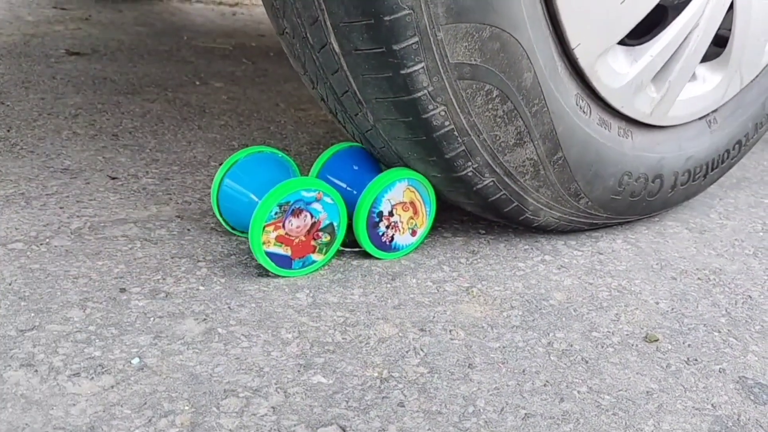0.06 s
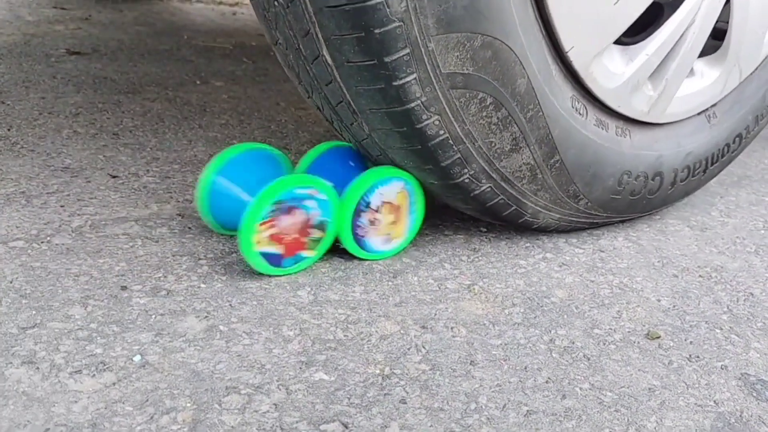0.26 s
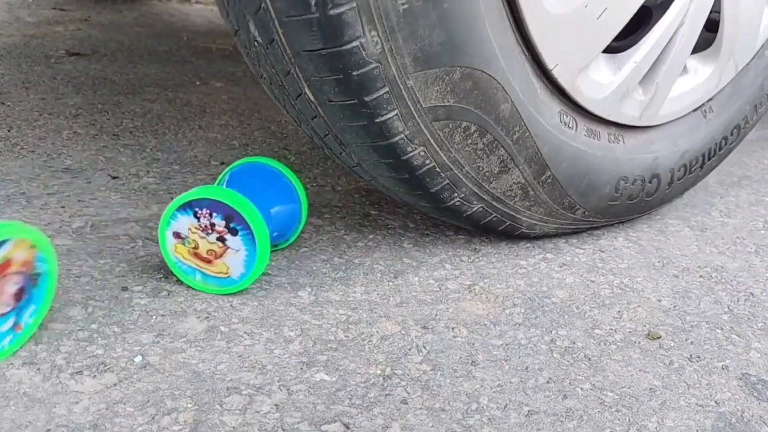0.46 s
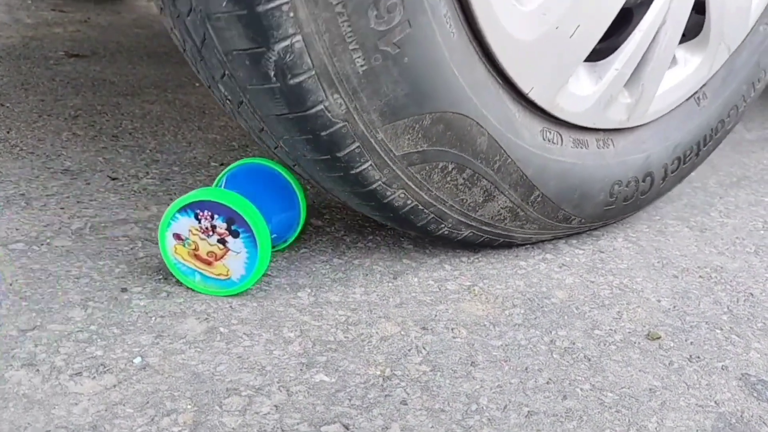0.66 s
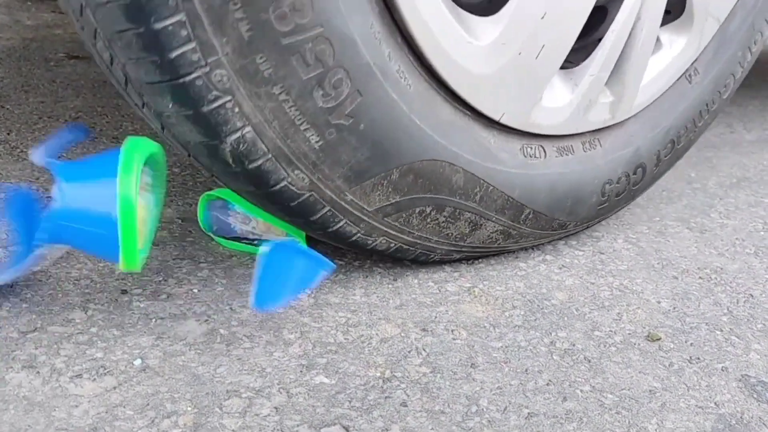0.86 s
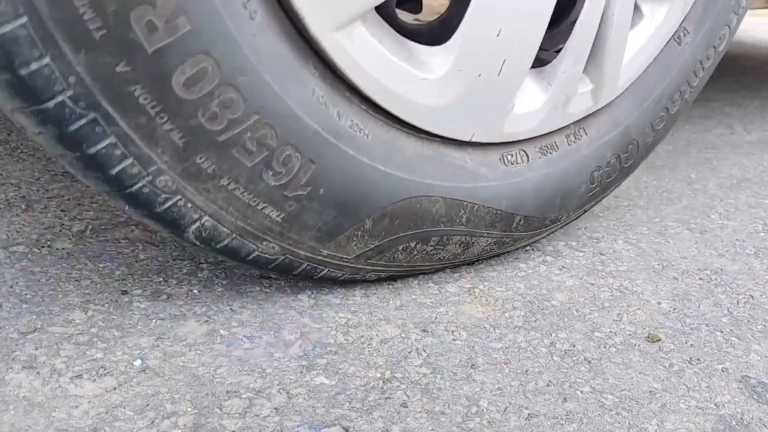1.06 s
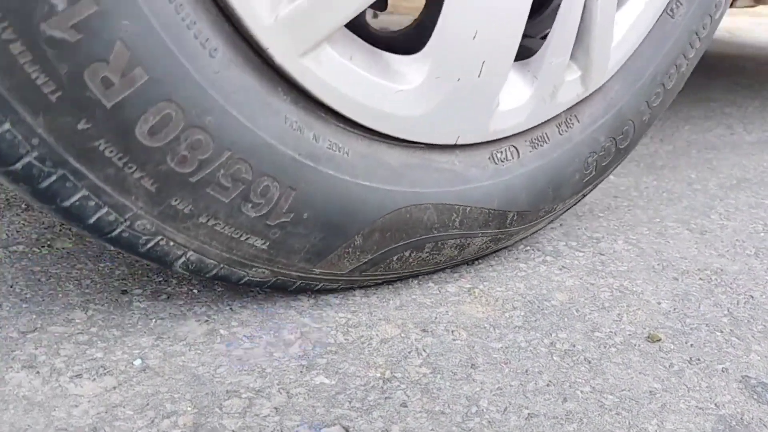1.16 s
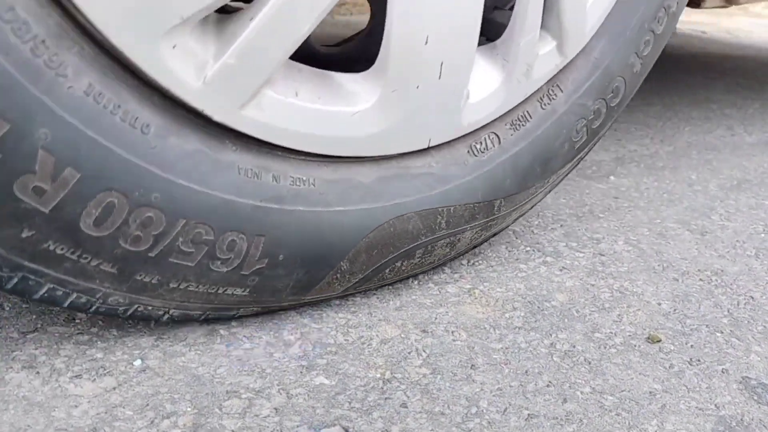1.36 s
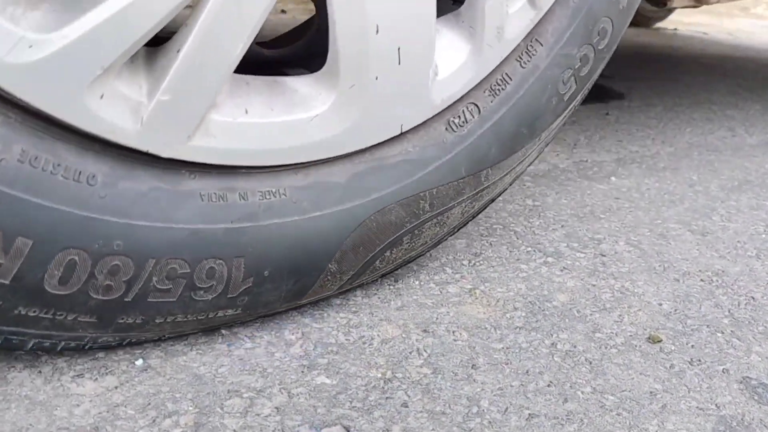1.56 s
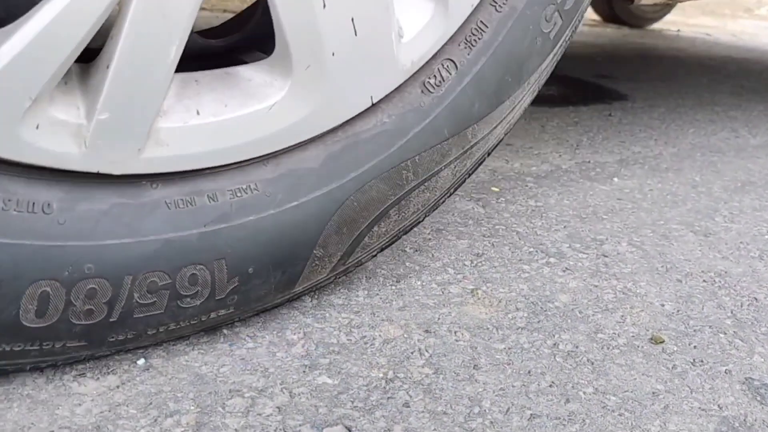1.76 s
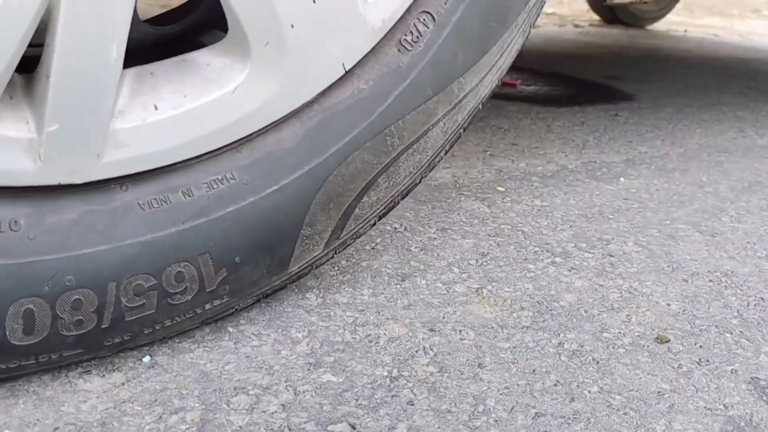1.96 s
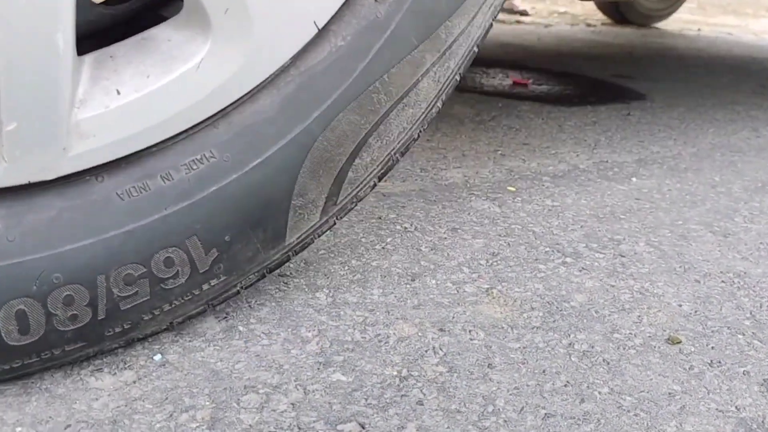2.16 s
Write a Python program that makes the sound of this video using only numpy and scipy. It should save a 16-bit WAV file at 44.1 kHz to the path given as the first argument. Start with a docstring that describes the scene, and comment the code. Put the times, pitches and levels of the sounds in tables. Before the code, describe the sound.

Plastic cracking, bursting and splintering as a car tyre crushes toys over a low engine rumble.

```python
"""On asphalt, close to the left microphone port, a car tyre rolls slowly over hollow plastic toy wheels.
The engine rumbles and a distant bird chirps as the tread starts to rub and crunch grit. The plastic pops,
cracks and bursts with a puff of air; a hollow shell hums, a loose disc clacks, the toy scrapes free.
Two more bursts come near 0.8 s, then splinters snap and dull thuds follow as the car draws level."""
import sys
import numpy as np
from scipy import signal
from scipy.fft import rfft, irfft, next_fast_len
from scipy.io import wavfile
from scipy.ndimage import uniform_filter1d

SR = 44100
rng = np.random.default_rng(int(sys.argv[2]) if len(sys.argv) > 2 else 0)


def wav_record(signal):
    """Record a signal, one row per channel, as 16-bit PCM in the file named by sys.argv[1]."""
    frames = np.transpose(np.atleast_2d(signal))
    bounded = np.clip(frames, -1, 1)
    # unit amplitude maps onto the largest positive 16-bit level
    quanta = np.round(bounded * 32767).astype(np.int16)
    wavfile.write(sys.argv[1], SR, quanta)


N = 97020
T = np.arange(SR * 3 // 4) / SR  # time within one event [s]
SHELL_RIGHT_DB = -4  # the shell at the right port, against the left

# rubbing and crumbling under the tread (time [s], level [dB])
TREAD_LOAD = [(0, -54.5), (.12, -48), (.22, -48), (.28, -31), (.35, -41.5), (.39, -31), (.47, -42),
              (.53, -38.5), (.56, -47.5), (.69, -51), (.73, -22.5), (.87, -29.5), (.92, -39.5),
              (1.05, -33.5), (1.15, -28), (1.24, -30), (1.29, -43), (1.45, -42), (1.6, -47.5), (1.68, -38),
              (1.76, -47.5), (1.91, -38.5), (2.04, -51.5), (2.2, -62.5)]
# spectrum of snapping grit and plastic (frequency [Hz], level [dB])
GRIT_SPECTRUM = [(300, -36.5), (1500, 4.5), (4500, 5), (8000, -0.5), (13000, -2.5), (16000, -11)]
# knocks on the hollow shell (time [s], level [dB], overtone gain [dB])
SHELL_KNOCKS = [(.272, -25.5, -1), (.373, -23.5, -9.5), (.438, -41, 10.5), (.76, -32, 4), (.842, -40.5, 5),
                (1.125, -28, 1)]
# modes of the hollow shell (frequency [Hz], level [dB], t60 [s])
SHELL_MODES = [(510, 0, 0.5), (668, -17, .3), (856, -14, 0.25), (892, -9, 0.5), (1070, -13, .25),
               (1109, -7, 0.5), (1238, -9, 0.3), (1427, -7, 0.21), (1739, -10, 0.33), (2600, -11, 0.2),
               (3311, -10, 0.24)]


def amp(db):
    """Decibels to gain."""
    return 10 ** (np.asarray(db) / 20)


def unit(x):
    """Scale to rms 1."""
    return x / np.sqrt(np.mean(x ** 2) + 1e-20)


def along(points, hz):
    """Interpolate (frequency, value) points on a log frequency axis."""
    f, v = np.transpose(points)
    return np.interp(np.log(hz + 1), np.log(f + 1), v)


def curve(rows):
    """Interpolate (time, value) rows to one value per sample."""
    return np.interp(np.arange(N) / SR, *np.transpose(rows))


def fade(t60, t=T):
    """Hold at 1 until t = 0, then fall 60 dB every t60 seconds."""
    return np.exp(-np.log(1000) * np.maximum(t, 0) / t60)


def coloured(x, gain, size=4096):
    """x through a minimum-phase filter with the given gain over frequency."""
    cepstrum = irfft(np.log(np.maximum(gain(np.fft.rfftfreq(size, 1 / SR)), 1e-6)))
    cepstrum[1:size // 2] *= 2
    cepstrum[size // 2 + 1:] = 0
    return signal.fftconvolve(x, irfft(np.exp(rfft(cepstrum))))[:len(x)]


def shaped(x, points):
    """Give x a spectrum; white noise keeps its power."""
    return coloured(x, lambda hz: unit(amp(along(points, hz))))


def add(out, s, x):
    """Mix x in at s seconds."""
    i = max(round(s * SR), 0)
    n = min(x.shape[-1], N - i)
    out[..., i:i + n] += x[..., :n]


def noises(n, correlation=0.869):
    """Partly alike white noises, one for each microphone port."""
    a, b = rng.standard_normal((2, n))
    return np.array([a, correlation * a + np.sqrt(1 - correlation ** 2) * b])


def shadowed(pair):
    """The right port is turned away and hears less treble."""
    # right port against left (frequency [Hz], gain [dB])
    shadow = [(60, 8.5), (400, -3.5), (700, -9.5), (1400, -17.5), (2500, -16.5), (4500, -30), (8000, -31),
              (15000, -13.5)]
    return np.array([pair[0], coloured(pair[1], lambda hz: amp(along(shadow, hz)))])


def engine(level_db=-47.5):
    """The engine runs low and steady, equally loud at both ports."""
    # engine noise (frequency [Hz], level [dB])
    spectrum = [(15, -2.5), (48, 11), (100, 5), (200, -3), (500, -12.5), (1500, -36), (5000, -65)]
    return amp(level_db) * np.array([unit(shaped(x, spectrum)) for x in noises(N)])


def rumble():
    """An uneven low rumble swells and sinks as the car rolls by."""
    # course of the rumble (time [s], level [dB])
    swells = [(0, -42.5), (.2, -56), (.31, -34.5), (.45, -83), (.68, -62.5), (.78, -29), (.92, -55.5),
              (1.2, -37), (1.55, -38.5), (1.88, -29.5), (1.97, -38), (2.2, -46)]
    # rumble noise (frequency [Hz], level [dB])
    spectrum = [(15, -33.5), (40, 2), (90, 2), (150, -4), (260, -12), (450, -28), (1200, -78.5)]
    return amp(curve(swells)) * np.array([unit(shaped(x, spectrum)) for x in rng.standard_normal((2, N))])


def chips(per_s=600, centre_hz=3749, t60=0.0214, spread_db=5):
    """Tiny pieces of plastic and stone click at random times, each with its own pitch."""
    out, t = np.zeros(N), T[T < t60]
    for _ in range(int(per_s * N / SR)):
        when, size, pitch = rng.random(), rng.exponential(), rng.standard_normal()
        hz = centre_hz * np.exp(pitch / 2)
        click = np.sin(2 * np.pi * hz * t) * fade(t60 * np.sqrt(centre_hz / hz), t)
        add(out, when * N / SR, amp(spread_db * min(size, 1)) * click)
    return unit(out)


def tread(rub_db=-6, grit_db=-8, chip_db=-5.5, grains_per_s=260, spread_db=5):
    """Plastic rubs on asphalt while grit and chips snap under the rubber, all following the load."""
    # plastic rubbing on asphalt (frequency [Hz], level [dB])
    rub_spectrum = [(150, -11), (450, 7), (1000, 5.5), (2500, 0), (5000, -10), (7500, -18.5), (13000, -19),
                    (16000, -17)]
    rub = np.array([shaped(x, rub_spectrum) for x in noises(N)])
    sizes = amp(spread_db * np.minimum(rng.exponential(size=N), 3))
    onsets = rng.random(N) < grains_per_s / SR
    grains = unit(signal.fftconvolve(sizes * onsets, fade(0.0099))[:N])
    load = amp(curve(TREAD_LOAD))
    snaps = amp(grit_db) * load * grains
    grit = np.array([shaped(x * snaps, GRIT_SPECTRUM) for x in noises(N)])
    return shadowed(load * (amp(rub_db) * rub + amp(chip_db) * chips()) + grit)


def bird():
    """Short gliding notes, far from the microphone."""
    # bird notes (time [s], length [s], start pitch [Hz], end pitch [Hz], level [dB])
    notes = [(0, 0.018, 6230, 5140, -36.5), (0.014, 0.0383, 3950, 5150, -41.5),
             (0.343, 0.022, 6300, 5500, -39.5)]
    out = np.zeros((2, N))
    for s, length, from_hz, to_hz, db in notes:
        u = T[T < length] / length
        phase = 2 * np.pi * np.cumsum(from_hz + (to_hz - from_hz) * u) / SR
        add(out, s, np.sin(phase) * np.sin(np.pi * u) * amp(db))
    return shadowed(out)


def pops(right_db=-7.5):
    """The plastic pops under load in short damped tones, sometimes several together."""
    # pops of the plastic (time [s], level [dB], pitch [Hz], t60 [s])
    tones = [(.112, -36, 606.4, 0.111), (.143, -22, 659.5, 0.159), (.1985, -25.5, 705.4, 0.122),
             (.1985, -24, 923, 0.07), (.1985, -25.5, 1642, 0.0192), (.735, -18.5, 406.1, 0.175),
             (.7725, -12, 455.4, 0.0398), (.7935, -6, 480, 0.0125), (1.255, -10.5, 743.5, .03),
             (1.303, -9.5, 1601, 0.0286), (1.51, -15.5, 1688, 0.0266), (1.9, -23.5, 685.6, 0.0286)]
    out = np.zeros((2, N))
    for s, db, hz, t60 in tones:
        tone = np.sin(2 * np.pi * hz * T) * fade(t60) * (1 - fade(0.0048))
        add(out, s, tone * amp([[db], [db + right_db]]))
    return out


def crack_colour(ring_hz, body_db, treble_db, ring_db=9.5, ring_q=9.5, bass_cut_hz=301.6):
    """Gain over frequency of breaking plastic: body, treble, little bass and one resonance."""
    bands = [(618, body_db), (2330, 0), (5500, 0.181 * treble_db),
             (7500, treble_db), (11560, treble_db), (16000, treble_db - 1)]

    def gain(hz):
        bass_cut = hz ** 2 / (hz ** 2 + bass_cut_hz ** 2)
        detuning = hz / ring_hz - ring_hz / (hz + 1)
        resonance = abs(1 + (amp(ring_db) - 1) / (1 + 1j * ring_q * detuning))
        return unit(amp(along(bands, hz)) * bass_cut * resonance)
    return gain


def splinter_ring(t, count=18, low_hz=994.1, high_hz=7512):
    """Splinters freed by a fracture ring together at random pitches."""
    hz = low_hz * (high_hz / low_hz) ** rng.random((count, 1))
    strengths = np.sqrt(hz) * rng.standard_normal((count, 1))
    return unit(np.sum(strengths * np.sin(2 * np.pi * hz * t), axis=0))


def cracks(size=8192, tear_samples=18, tear_spread_db=7.5, tail_db=-11.5, tail_hz=8060, splinter_db=-15):
    """Each fracture is a run of tiny tears with a duller tail; its splinters ring briefly."""
    # fractures (time [s], length [s], resonance [Hz], level [dB], body [dB], treble [dB])
    fractures = [(0.138, 0.01365, 1800, -30, -0.5, -8), (0.2308, 0.0129, 1380, -27.5, 1.5, -4),
                 (0.2442, 0.0082, 3127, -11.5, 13.5, -18.5), (0.2678, 0.00348, 940, -13, 22, -5),
                 (0.713, 0.0074, 1195, -23, 18, -16), (0.7328, 0.0018, 742, -17, 9.5, -22.5),
                 (0.736, 0.0045, 2656, -17, 8.5, -5.5), (0.753, 0.001225, 479, -13.5, 27.5, 7.5),
                 (0.771, 0.0022, 1673, -16.5, 4, -17.5), (0.775, 0.00463, 1213, -16, 10.5, -4),
                 (0.802, 0.00945, 5490, -21, 16.5, -5), (0.823, 0.003, 1868, -17, 0.5, -13.5),
                 (0.8364, 0.00618, 2865, -8.5, 17.5, -3), (0.847, 0.0135, 5450, -23.5, 5.5, 5.5),
                 (0.875, 0.0057, 4080, -22.5, -2, 0.5), (1.086, 0.00435, 2513, -14, -7, -7),
                 (1.0876, 0.002, 2148, -17, -5, -20), (1.124, 0.00434, 1880, -21, 6.5, -8.5),
                 (1.177, 0.00435, 5570, -15, -13, -11.5), (1.239, 0.0109, 2110, -24, -1.5, -18.5),
                 (1.255, 0.00141, 1038, -11, 5, -15.5), (1.3045, 0.00311, 2080, -15.5, -2.5, -9.5),
                 (1.319, 0.00218, 1845, -21.5, 0.5, -38.5), (1.412, 0.0057, 1657, -27.5, 8, -17.5),
                 (1.467, 0.0048, 8430, -28.5, -46, 9.5), (1.509, 0.00757, 1695, -30.5, 3.5, -13.5),
                 (1.544, 0.0084, 6160, -28.5, 1, -5), (1.555, 0.01705, 1610, -37, 0, -62.5),
                 (2.078, 0.00266, 1524, -28, 5, -8)]
    out, t = np.zeros((2, N)), T[:size]
    for s, length, ring_hz, db, body_db, treble_db in fractures:
        rise, since_break = t / length, t - length
        tears = amp(tear_spread_db * np.repeat(rng.standard_normal(size), tear_samples)[:size])
        tearing = np.minimum(2 * rise + 0.68, 1) * fade(0.01207, since_break) * tears
        splinters = amp(splinter_db) * splinter_ring(t) * np.minimum(rise, 1) * fade(0.0965, since_break)
        noise = noises(size)
        dull = np.array([coloured(x, lambda hz: 1 / (1 + (hz / tail_hz) ** 2 / 2)) for x in noise])
        tail = amp(tail_db) * fade(0.078, since_break) * dull
        colour = crack_colour(ring_hz, body_db, treble_db)
        pair = shadowed([coloured(x, colour) for x in noise * tearing + tail + splinters])
        onset_rms = np.sqrt(np.mean(pair[0, t < length + .001] ** 2))
        add(out, s, amp(db) * pair / onset_rms)
    return out


def bursts(push_s=0.00317, right_db=-20):
    """A collapsing shell puffs air at the left port; the right gets a shorter puff and a crack."""
    # bursts of trapped air (time [s], puff level [dB], crack level on the right [dB])
    puffs = [(.269, -7, -21), (0.7537, -4.5, -34), (.841, -4, -17.5)]
    out = np.zeros((2, N))
    u = np.array([T, 3 * T]) / push_s
    push = (1 - u) * np.exp(-u / 1.38) * (1 - np.exp(-8 * u))  # pressure, then suction
    for s, db, crack_db in puffs:
        add(out[1], s, amp(crack_db) * fade(0.03) * shaped(rng.standard_normal(len(T)), GRIT_SPECTRUM))
        add(out, s, push * amp([[db], [db + right_db]]))
    return out


def shell_ring(upper_db, scatter_db):
    """The shell's damped modes, the upper ones struck a little differently each time."""
    (hz, db, t60), *upper = SHELL_MODES
    ring = amp(db) * fade(t60) * np.sin(2 * np.pi * hz * T)
    for hz, db, t60 in upper:
        gain = amp(db + upper_db + scatter_db * rng.standard_normal())
        ring += gain * fade(t60) * np.sin(2 * np.pi * (hz * T + rng.random()))
    return ring


def shell_hums():
    """The hollow shell hums after each knock."""
    out = np.zeros((2, N))
    for s, db, upper_db in SHELL_KNOCKS:
        hum = shell_ring(upper_db, scatter_db=3.5) * (1 - fade(0.0016))
        add(out, s, hum * amp([[db], [db + SHELL_RIGHT_DB]]))
    return out


def shell_singing(level_db=-42.5, load_exponent=0.462):
    """Once the shell is struck, rubbing keeps its modes sounding, louder under more load."""
    hum = signal.fftconvolve(rng.standard_normal(N), shell_ring(upper_db=-9, scatter_db=1))[:N]
    hum /= np.sqrt(abs(uniform_filter1d(hum ** 2, SR // 10)) + 1e-12)  # even out the level
    struck = np.arange(N) / SR > SHELL_KNOCKS[0][0]
    drive = amp(load_exponent * curve(TREAD_LOAD)) * struck
    return hum * unit(drive) * amp([[level_db], [level_db + SHELL_RIGHT_DB]])


def splinter_ticks(mode_count=4, ring_db=-4, ring_t60=0.0568, click_t60=0.0195):
    """A splinter snaps with a click and rings briefly in a few close modes."""
    # single splinters snapping (time [s], level [dB], pitch [Hz])
    snaps = [(.378, -28, 9025), (0.935, -22, 4360), (0.957, -22, 2537), (.993, -24, 5230),
             (1.0245, -24, 12400), (1.052, -24, 2527), (1.066, -23, 4222), (1.141, -21, 12670),
             (1.231, -22, 7685), (1.919, -29.5, 6190)]
    out = np.zeros((2, N))
    for s, db, hz in snaps:
        modes_hz = hz * np.exp(rng.standard_normal((mode_count, 1)) / 10)
        ring = np.sin(2 * np.pi * modes_hz * T).sum(axis=0) / np.sqrt(mode_count) * fade(ring_t60)
        click = np.array([shaped(x * fade(click_t60), GRIT_SPECTRUM) for x in noises(len(T))])
        add(out, s, amp(db) * (click + amp(ring_db) * ring))
    return shadowed(out)


def disc_clacks(swell_s=0.00483, focus_db=7, rattle_db=-1, click_db=5, right_db=-24.5):
    """The loose disc is knocked about: a click, a rattle and its modes, the lowest ringing longest."""
    # knocks on the disc (time [s], level [dB], lowest mode gain [dB], best excited frequency [Hz])
    knocks = [(.435, -41, 11, 1750), (0.555, -24, -6, 3120), (.613, -24, -3.5, 3550), (.9, -24, 6, 4660),
              (1.179, -19, -2, 5700), (1.346, -23.5, 9.5, 5750), (1.618, -35.5, 11, 5780),
              (1.786, -35, -26, 2370), (1.8588, -35, 3.5, 4370), (2.184, -33.5, 6, 2890)]
    # modes of the disc (frequency [Hz], level [dB], t60 [s])
    modes = [(1545, -3, .29), (1735, -12, .11), (2310, -9, .1), (2560, -10, .1), (2880, -13, .07),
             (3100, -9, .12), (3770, -7, .1), (4150, -13, .07), (4690, -9, .09), (5250, -13, .07),
             (5700, -6, .07), (6035, -11, .06), (10400, -17, .05)]
    # rattle of the disc (frequency [Hz], level [dB])
    rattle_spectrum = [(300, -14.5), (1500, -20.5), (3000, 10), (6000, 6), (9000, -34)]
    (low_hz, low_db, low_t60), *upper = modes
    lowest = np.sin(2 * np.pi * low_hz * T) * fade(low_t60) * (1 - np.exp(-T / swell_s))
    out = np.zeros((2, N))
    for s, db, low_gain_db, focus_hz in knocks:
        ring = amp(low_db + low_gain_db) * lowest
        for hz, mode_db, t60 in upper:
            favour = np.exp(-(10 * np.log(hz / focus_hz)) ** 2)  # the spot struck favours some modes
            gain = amp(mode_db + focus_db * favour + 2 * rng.standard_normal())
            ring += gain * fade(t60) * np.sin(2 * np.pi * (hz * T + rng.random()))
        rattle = amp(rattle_db) * fade(0.0792) * shaped(rng.standard_normal(len(T)), rattle_spectrum)
        click = amp(click_db) * fade(0.01694) * shaped(rng.standard_normal(len(T)), GRIT_SPECTRUM)
        add(out, s, (ring + rattle + click) * amp([[db], [db + right_db]]))
    return out


def scrape(start_s=.47, length_s=0.0635, level_db=-35):
    """The toy slides out from under the tread, faster and faster over asphalt, then springs free."""
    out, u = np.zeros((2, N)), T[T < length_s] / length_s
    friction = np.array([shaped(x, GRIT_SPECTRUM) for x in noises(len(u))])
    add(out, start_s, amp(level_db) * np.sin(np.pi * u ** 2) * friction)
    return shadowed(out)


def thuds(typical_width_s=0.002008):
    """Dull thuds as the car draws level, each a single swing of pressure."""
    # thuds (time [s], peak level [dB])
    pulses = [(1.168, -26), (1.374, -21.5), (1.482, -29.5), (1.618, -22.5), (1.748, -27.5), (1.788, -21.5),
              (1.84, -21.5), (1.87, -17.5), (1.907, -19.5), (2.135, -32)]
    out = np.zeros(N)
    for s, db in pulses:
        width_s = typical_width_s * amp(2 * rng.standard_normal())
        u = (np.arange(N) / SR - s) / width_s
        out -= amp(db) * np.sqrt(np.e) * u * np.exp(-u * u / 2)
    return out


def scene(echo_db=-8.5, echo_t60=0.0596, right_lag_s=.00046, rumble_right_db=-15):
    """The car's underside answers briefly; all but the car's low sounds reach the right port later."""
    direct = (cracks() + splinter_ticks() + disc_clacks() + shell_hums() + pops()
              + shell_singing() + tread() + scrape() + bird())
    underside = rng.standard_normal((2, len(T))) * fade(echo_t60)
    echo = signal.fftconvolve(direct, underside / np.linalg.norm(underside[0]), axes=1)[:, :N]
    left, right = direct + amp(echo_db) * echo + bursts()
    late_right = np.pad(right, (round(right_lag_s * SR), 0))[:N]
    car = engine() + (rumble() + thuds()) * amp([[0], [rumble_right_db]])
    return np.array([left, late_right]) + car


def record(dry, ceiling=.8, top_hz=16000):
    """Peaks are rounded off and nothing is kept above the band limit."""
    rounded = dry / (1 + (dry / ceiling) ** 6) ** (1 / 6)
    size = next_fast_len(N + SR // 2)
    in_band = np.fft.rfftfreq(size, 1 / SR) < top_hz
    return irfft(rfft(rounded, size) * in_band, size)[:, :N]


dry = scene()
out = record(dry)
wav_record(out)
```